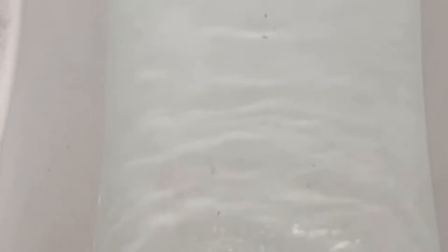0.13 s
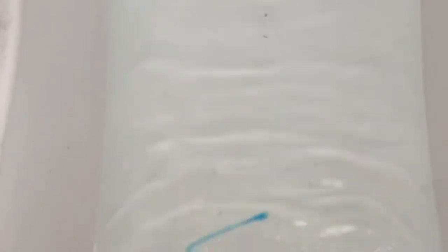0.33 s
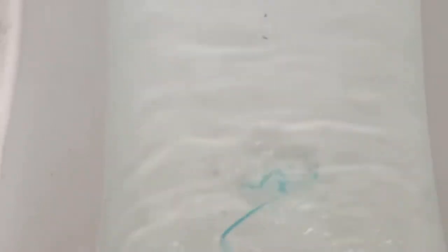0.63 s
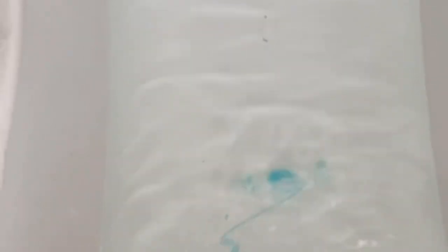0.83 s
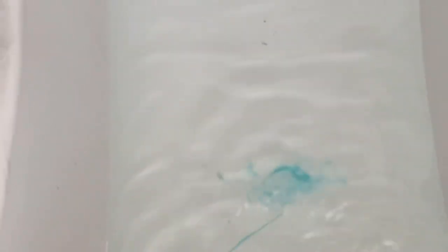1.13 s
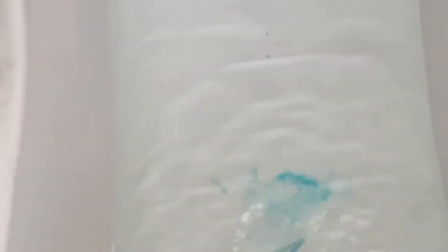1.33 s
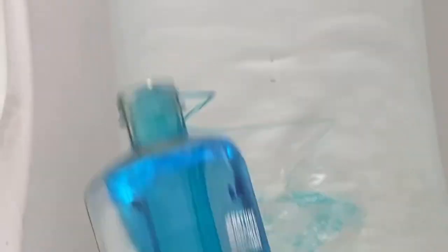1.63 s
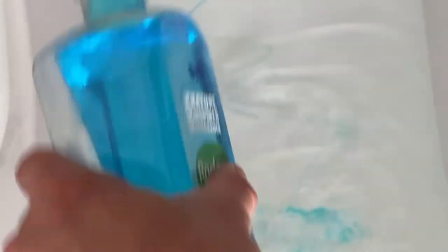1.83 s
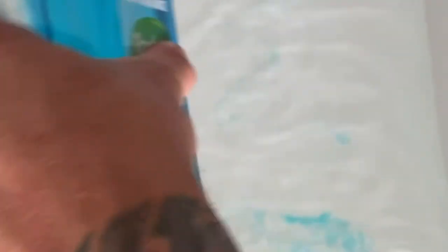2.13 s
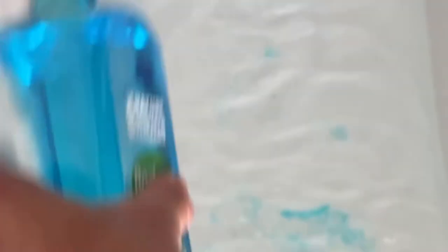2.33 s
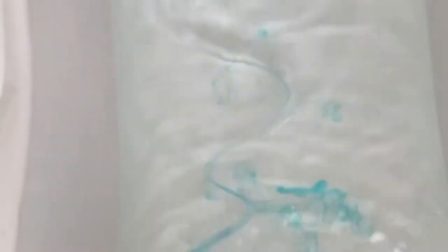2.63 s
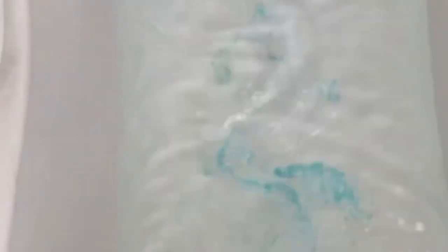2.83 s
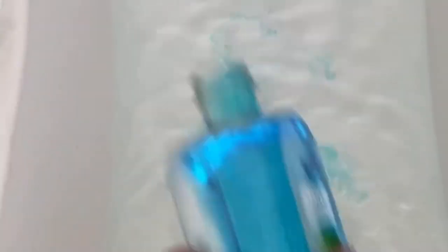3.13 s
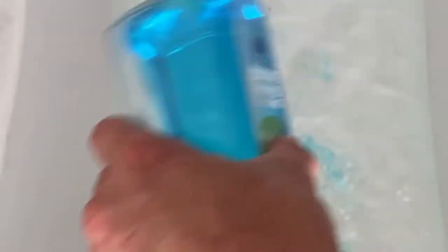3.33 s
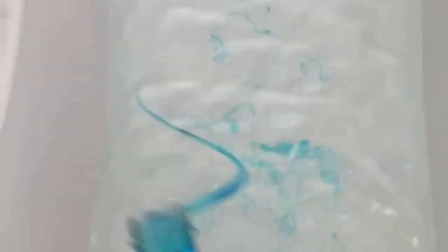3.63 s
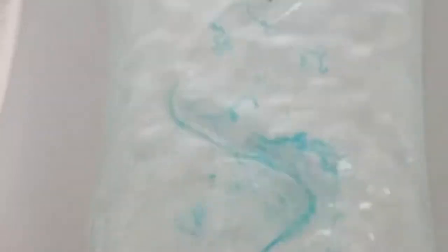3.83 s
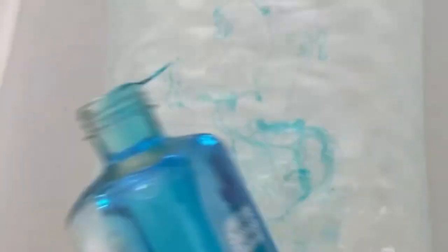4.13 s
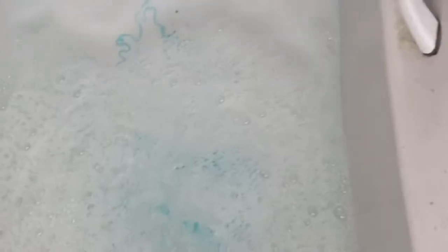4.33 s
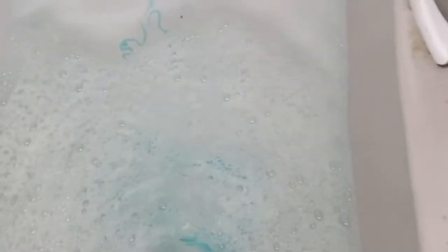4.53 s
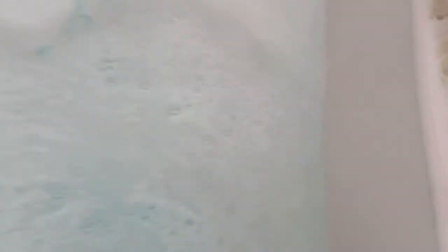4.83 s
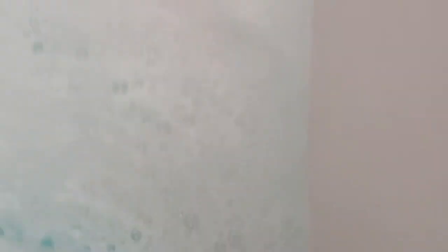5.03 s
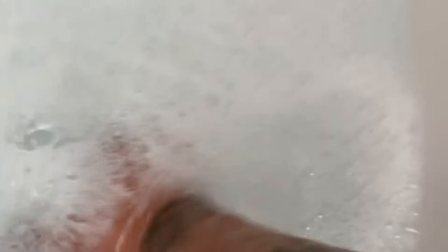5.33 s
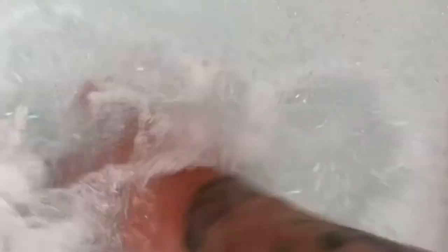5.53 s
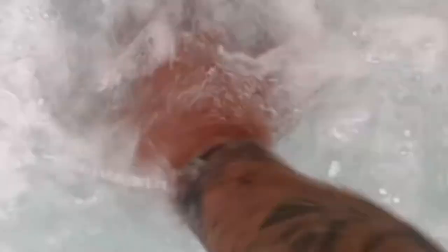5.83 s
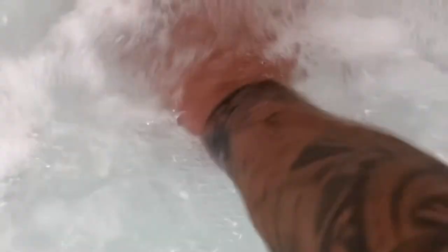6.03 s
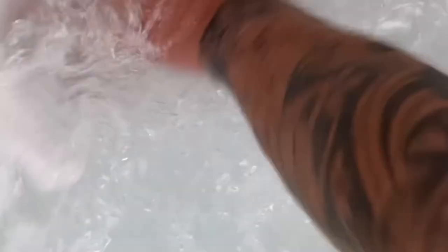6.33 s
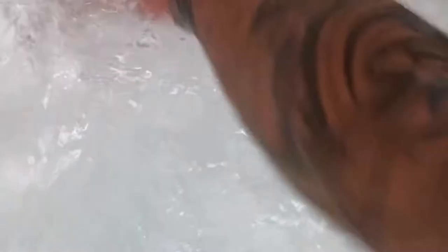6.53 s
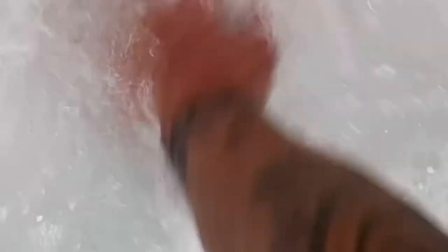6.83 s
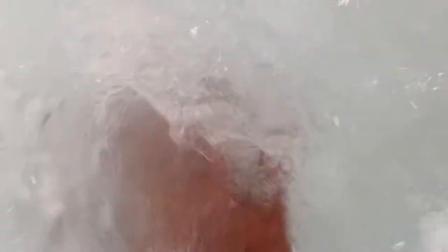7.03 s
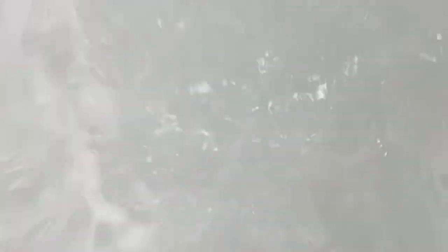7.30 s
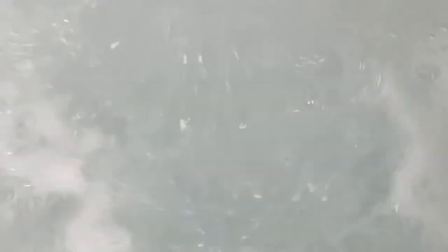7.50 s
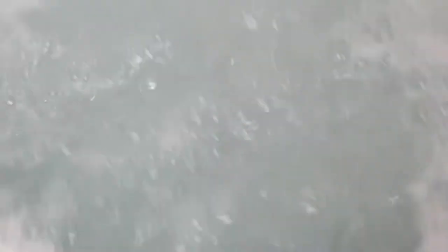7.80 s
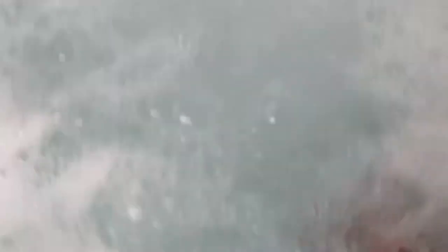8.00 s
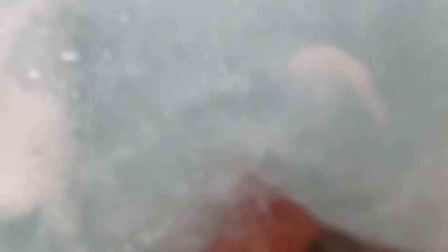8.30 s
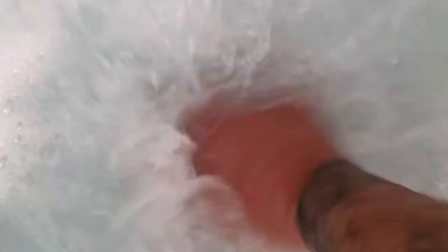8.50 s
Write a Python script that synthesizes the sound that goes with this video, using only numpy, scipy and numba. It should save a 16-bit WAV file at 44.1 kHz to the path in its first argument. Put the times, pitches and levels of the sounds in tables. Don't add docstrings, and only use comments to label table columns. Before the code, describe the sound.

A tap gushes steadily into a filling bathtub, then, suddenly closer, a hand churns the water with thumps, gurgles and splashes until an abrupt stop.

```python
import sys
import numpy as np
from scipy import signal
from scipy.fft import rfft, irfft, next_fast_len
from scipy.io import wavfile
from scipy.ndimage import uniform_filter1d, map_coordinates
from numba import njit

SR = 44100
rng = np.random.default_rng(int(sys.argv[2]) if len(sys.argv) > 2 else 0)


def unload_wav(signal):
    wavfile.write(
        sys.argv[1],
        SR,
        np.round(np.clip(np.atleast_2d(signal).T, -1, 1) * 32767).astype(np.int16),
    )


def volts_from_db(level):
    exponent = np.asarray(level, float) / 20
    return 10 ** exponent


N = 381906
CUT_S = 4.26


def unit(x):
    return x / np.sqrt(np.mean(x ** 2) + 1e-20)


def along(points, hz):
    f, *columns = np.transpose(points)
    return [np.interp(np.log(hz + 1), np.log(f), column) for column in columns]


def filtered(x, response):
    size = next_fast_len(x.shape[-1] + 8192)
    spectrum = rfft(x, size) * response(np.fft.rfftfreq(size, 1 / SR))
    return irfft(spectrum, size)[..., :x.shape[-1]]


def wander(n, rate_hz):
    knots = rng.standard_normal(int(n * rate_hz / SR) + 4)
    return map_coordinates(knots, [np.arange(n) * rate_hz / SR])


def water(start, n, modes, colours, trim_db, grain):
    # time_s, spray_db (jet), churn_db (bath)
    flow = [(0, -36, -40), (2.5, -35, -39), (4.25, -33, -38), (4.27, -29, -38), (4.4, -30, -37.5),
            (4.75, -28, -36.5), (5.0, -30, -34), (5.4, -28.5, -31.5), (5.85, -28.5, -35.5), (6.1, -30, -31),
            (6.55, -31, -33.5), (7.1, -28.5, -29.5), (7.47, -27.5, -29.5), (7.54, -31.5, -33.5),
            (7.65, -31, -32), (8.0, -27, -32), (8.28, -27.5, -32), (8.66, -27, -29)]
    swash_share = (0.91, 0.44, 0.27, 0.1)
    wall_lag_s = 0.035
    time_s, spray_db, churn_db = np.transpose(flow)
    t = (start + np.arange(n)) / SR
    spray_db, churn_db = np.interp(t, time_s, spray_db), np.interp(t, time_s, churn_db)
    flow_db = (churn_db, churn_db, spray_db, spray_db)
    thud, lift = waves(t - wall_lag_s, column=3), waves(t, column=1)
    lifts = (thud, lift, lift, lift)

    gurgle = bubbles(n, count=1500, low_hz=277.4, high_hz=2220, cycles=4.6, spread_db=0.5, rise=0.27)
    ring = bubbles(n, count=1500, low_hz=2100, high_hz=4840, cycles=4.96, spread_db=5.0, rise=0.08)
    fizz = bubbles(n, count=2500, low_hz=3880, high_hz=13200, cycles=5.0, spread_db=10.5, rise=0.036)
    voices = [boom(n, modes)]
    for colour, swarm, share in zip(colours, (gurgle, ring, fizz), grain):
        voices.append(layer(colour, swarm, share, patchy_db=1.0))

    churn, flutter = wander(n, rate_hz=18), wander(n, rate_hz=45)
    churn_depth_db, own_depth_db = (.2, 0.21, 0.46, 0.34), (1.2, 1, 0.33, 0.15)
    flutter_depth_db = (0, .4, 1.2, 1.5)
    total = slosh(t)
    for k, voice in enumerate(voices):
        level_db = flow_db[k] + swash_share[k] * lifts[k] + trim_db[k]
        level_db = level_db + flutter_depth_db[k] * flutter + churn_depth_db[k] * churn
        level_db = level_db + own_depth_db[k] * wander(n, rate_hz=18)
        total = total + volts_from_db(level_db) * voice
    return total


def boom(n, modes, top_hz=1100):
    steady = 0.54

    def shell(f):
        power = 0
        for pitch_hz, width_hz, level_db in modes:
            resonance = f * width_hz / (pitch_hz ** 2 - f * f + 1j * f * width_hz)
            power = power + np.abs(volts_from_db(level_db) * resonance) ** 2.485
        return np.sqrt(power)

    def edges(f):
        return (f / 62) ** 3 / (1 + (f / 62) ** 3) / (1 + (f / top_hz) ** 4)

    x = unit(filtered(patchy(n, patchy_db=0.0), lambda f: shell(f) * edges(f)))
    low = filtered(x, lambda f: 1 / (1 + (f / 125) ** 8))
    swell = uniform_filter1d(uniform_filter1d(unit(low) ** 2, size=900), size=900)
    swell = np.abs(swell) + 0.058
    return unit(x - low + low * swell ** (-steady / 2))


def layer(colour, swarm, grain, patchy_db):
    grain = np.clip(grain, 0, 1)
    mix = np.sqrt(grain) * swarm + np.sqrt(1 - grain) * unit(patchy(len(swarm), patchy_db))
    return unit(filtered(mix, lambda hz: volts_from_db(along(colour, hz)[0]) * (hz > colour[0][0] / 2)))


def patchy(n, patchy_db):
    z = signal.stft(rng.standard_normal(n + 512), nperseg=512)[2]
    field = uniform_filter1d(rng.standard_normal(z.shape), size=7, axis=0)
    field = uniform_filter1d(field, size=6, axis=1)
    return signal.istft(z * volts_from_db(patchy_db * unit(field)), nperseg=512)[1][:n]


def bubbles(n, count, low_hz, high_hz, cycles, spread_db, rise):
    draw = rng.random((count * n // SR, 4))
    start = (draw[:, 0] * n).astype(int)
    hz = low_hz * (high_hz / low_hz) ** draw[:, 1]
    life_cycles = cycles * (.5 + draw[:, 2])
    gain = volts_from_db(-spread_db * np.log(draw[:, 3] + 0.018)) * np.sqrt(hz)
    out = np.zeros(n)
    add(out, start, hz, life_cycles, gain, rise, SR)
    return unit(filtered(out, lambda f: 1 + f / high_hz))


@njit
def add(out, start, hz, cycles, gain, rise, sr):
    for k in range(len(start)):
        life = cycles[k] * sr / hz[k]
        for i in range(min(int(life), len(out) - start[k])):
            u = i / life
            envelope = gain[k] * 16 * u * np.exp(-6 * u)
            out[start[k] + i] += envelope * np.sin(2 * np.pi * cycles[k] * u * (1 + rise * u / 2))


def waves(t, column):
    swashes = [(4.852, 2.5, 0.034, 4.5), (5.083, 8.5, 0.039, 0), (5.162, 8, 0.08, 8),
               (5.34, 4.5, 0.037, -2), (5.537, 6, 0.026, 6.5), (6.002, -1, 0.049, -1.5),
               (6.288, 10, 0.039, -0.5), (6.792, 10.5, 0.044, -0.5), (6.879, 11.5, 0.012, 1.5),
               (6.983, 0, .02, -7), (7.324, 1.5, 0.071, -1), (7.567, 12, 0.056, 1), (7.77, 4.5, 0.12, 2.5),
               (8.309, 16, 0.03, 2), (8.431, 14, 0.028, -1), (8.538, 11.5, 0.018, -0.5),
               (8.652, 11, .04, 0)]
    attack_s, release_s = 0.022, 0.027
    lift_db = 0
    for row in swashes:
        start_s, hold_s = row[0], row[2]
        onset = np.clip(1 + (t - start_s) / attack_s, 0, 1)
        fall = np.exp(-np.maximum(t - start_s - hold_s, 0) / release_s)
        lift_db = lift_db + row[column] * onset * fall
    return lift_db


def slosh(t):
    # pitch_hz, level_db (per Hz)
    slosh_colour = [(150, -2), (260, 1.5), (450, -3), (800, 8.5), (1300, 2), (2200, -32)]
    swarm = bubbles(len(t), count=700, low_hz=210, high_hz=1200, cycles=2.0, spread_db=2.5, rise=0.23)
    body = layer(slosh_colour, swarm, 0.14, patchy_db=-2.0)
    return volts_from_db(-38) * (volts_from_db(waves(t, column=1)) - 1) * body


def plunging_hand():
    # start_s, level_db (peak), pitch_hz, pan_db (left over right)
    thumps = [(5.015, -25, 79, 3), (5.14, -12, 71.4, -2), (5.178, -3, 84, 2), (5.182, -3, 150, 0),
              (5.205, -10, 125, -2), (5.2, -12, 209, -2), (5.245, -19, 101, 0), (5.25, -17, 174, 0),
              (5.293, -12, 105, 2), (5.355, -7.5, 85, 2), (5.548, -10.5, 82.6, 2), (5.585, -13, 96.7, -5),
              (5.64, -11.5, 91, -3), (5.998, -7.5, 79.4, 4), (6.248, -11.5, 83, 2),
              (6.697, -13.5, 87.5, -3), (6.8, -11.5, 93, -2), (7.34, -8, 88, 10), (8.338, -9, 129, -2),
              (8.511, -13, 209, 0)]
    return drops(thumps, cycles=11.2, gain_db=-12.0, rise=0.069) + slaps(thumps, gain_db=-16.5, t60=0.13)


def big_bubbles():
    # start_s, level_db (peak), pitch_hz, pan_db (left over right)
    plops = [(4.688, -10, 2900, -4), (4.94, -14, 2390, -6), (5.085, -22, 790, 8), (5.547, -15.5, 353, 1),
             (6.099, -6, 1670, 4), (6.162, -13.5, 1650, 14), (6.289, -17, 1030, -3), (6.436, -6.5, 2100, 2),
             (6.607, -7.5, 1970, 11), (6.647, -15.5, 1700, 12), (6.783, -14, 1330, 12),
             (6.875, -9.5, 580, -3), (6.921, -19, 1020, 12), (6.965, -13.5, 1690, 12), (6.98, -20, 1860, 6),
             (6.996, 3, 1760, 6.5), (6.998, -12, 1070, 0), (6.997, -16, 2300, -4), (7.189, -4, 3730, -2),
             (7.329, -12, 860, 6), (7.363, -13, 2200, -8), (7.552, -16, 1030, 5), (7.773, -15.5, 487, 0),
             (7.806, -14.5, 1080, 9), (7.847, -5, 1640, 3), (7.6, -18, 1010, -3), (7.625, -21, 890, -2),
             (6.81, -11, 2100, 5), (6.83, -8.5, 1780, 12), (8.555, -20, 1480, 26), (7.045, -14, 905, -1),
             (8.211, -10.5, 3030, 0), (8.281, -19, 875, 8), (8.308, -17, 1410, 18), (8.404, -18, 463, -3),
             (8.429, -24, 860, 5), (8.515, -16, 510, -1)]
    # start_s, level_db (peak), pitch_hz, pan_db (left over right)
    bloops = [(0.694, -4, 2940, 6.5), (0.46, -25, 750, 0), (0.86, -22, 756, -4), (0.88, -22.5, 770, -2),
              (1.158, -22, 1385, -7), (1.38, -23, 1070, -10), (2.365, -23.5, 737, -1), (3.86, -25, 755, -8),
              (3.976, -23, 1040, -10), (4.084, -23, 734, -7), (7.578, -13, 856, -2)]
    # start_s, level_db (peak), pitch_hz, pan_db (left over right)
    gulps = [(1.067, -31, 813, -3), (1.24, -19, 760, -8), (1.299, -22.5, 760, -10), (1.647, -20, 460, -7),
             (1.936, -23, 765, -14), (2.181, -23, 800, -6), (4.443, -19, 1040, 6), (5.091, -11, 495, -3),
             (5.631, -17, 520, 0.0), (5.984, -16, 800, 2), (6.057, -10.5, 550, -5), (6.319, -10.5, 555, -2),
             (6.702, -12.5, 1510, 13), (6.743, -10, 1570, 6), (7.145, -8, 1720, -11),
             (7.185, -6.5, 1910, 2), (7.472, -25, 440, -1), (7.49, -17, 347, 0.0), (7.755, -26, 511, -2),
             (8.326, -8, 480, -1), (8.379, -12, 526, 1.5), (8.54, -22, 450, -2)]
    out = drops(plops, cycles=11.1, gain_db=-4.5, rise=0.011)
    out += drops(bloops, cycles=19.0, gain_db=-4.5, rise=0.013)
    out += drops(gulps, cycles=13.0, gain_db=-11.0, rise=0.017)
    return out + slaps([*plops, *bloops, *gulps], gain_db=-7.0, t60=0.025)


def lapping_ripples():
    # start_s, level_db (peak), pitch_hz
    pockets = [(0.2, -19, 475), (0.501, -21, 308), (0.505, -20, 480), (1.15, -17, 446), (1.241, -22.5, 312),
               (1.663, -16, 500), (1.98, -16, 444), (2.33, -17, 447), (2.415, -19, 740), (2.6, -17, 436),
               (2.699, -22, 310), (2.939, -27, 420), (3.21, -18, 308), (3.275, -15, 302), (3.325, -17, 301),
               (5.1, -6, 900), (5.115, -17, 520), (5.13, -15, 400), (5.16, -9, 990), (5.2, -18, 610),
               (5.221, -11, 900), (5.532, -13, 1190), (5.559, -16, 423), (5.58, -11, 378), (5.6, -16, 520),
               (5.734, -16, 541), (6.805, -11, 810), (6.81, -13, 1550), (6.885, -8, 890), (6.878, -5, 2200),
               (6.84, -13, 1910), (6.89, -10, 1600), (6.3, -6, 1500), (6.33, -12, 2100), (6.95, -19, 1200),
               (6.92, -8, 1500), (7.294, -17, 471), (7.315, -13, 297), (7.33, -13, 280), (7.322, -8, 900),
               (7.405, -10, 340), (7.425, -11, 597), (7.69, -12, 293), (8.05, -10, 460), (8.335, -9, 806),
               (8.35, -19, 191), (8.37, -15, 168), (8.443, -9, 490), (8.461, -3, 546), (8.475, -9, 480),
               (8.485, -5.5, 513), (8.55, -13, 900), (8.654, -7, 950), (8.655, -2, 2550), (8.428, -9, 2600),
               (8.311, -11, 1000)]
    centred = [(*row, 0) for row in pockets]
    return drops(centred, cycles=7.7, gain_db=-10.0, rise=0.033) + slaps(centred, gain_db=-15.5, t60=0.031)


def ticking_droplets():
    # start_s, level_db (peak), pitch_hz, pan_db (left over right)
    ticks = [(0.1034, -30, 3160, 0.0), (0.347, -15, 3140, -1.0), (0.4294, -18, 2870, 8),
             (0.5696, -18, 2900, 9), (0.7462, -26, 3070, 2), (1.71, -11, 3060, -2), (2.726, -16, 3040, 8),
             (2.8746, -15, 2940, 10), (3.5379, -23, 2900, 2.0), (3.6142, -12, 2880, 2),
             (4.3251, -15, 3320, -5), (5.0454, -28, 2990, -2), (5.1756, -17, 3060, -0.5),
             (6.064, -17, 3190, 0.0), (6.2898, -14, 2830, 1.0), (6.323, -8.5, 3350, 6),
             (6.4921, -16, 3280, 5), (6.7441, -14, 3680, 7), (6.777, -11, 3990, 4), (6.8634, -12, 4330, 3),
             (6.9212, -14, 3150, 0.0), (7.4433, -13, 3830, 6), (7.5767, -15, 2580, -12),
             (7.638, -15, 3650, 0.0), (7.951, -15, 3900, 0.0), (8.078, -16, 2940, 1.0),
             (8.114, -15, 3290, 3), (8.1743, -13, 4580, 3), (8.31, -17, 2570, -5), (8.3278, -11, 2570, -2),
             (8.43, -7, 3250, 0.5), (8.538, -13, 2560, 1.0), (8.6376, -16, 2870, 5)]
    return drops(ticks, cycles=7.8, gain_db=-1.0, rise=0.03)


def bursting_drops():
    # start_s, level_db (peak), pitch_hz, pan_db (left over right)
    spits = [(0.2798, -16, 7660, 7), (1.9867, -15, 7200, 0), (3.3558, -9, 11800, -3),
             (4.1132, -20.5, 8660, 7), (4.3278, -13, 7840, 8), (4.4051, -12, 6100, 2),
             (4.5082, -16, 8400, 11), (4.6056, -27, 9080, 2), (4.69, -9, 5730, -1), (4.7437, -5, 8400, 3.5),
             (4.7656, -9, 8030, -1), (4.8168, 5, 7200, -2), (5.0483, -4, 9050, 4), (5.2627, -5, 10900, -6),
             (5.3385, -11, 11200, 5), (5.5283, -27, 9850, -2), (5.6007, -14, 13000, 18),
             (5.6892, 0.5, 8700, 2.5), (5.7347, -8, 10000, 5), (5.921, -4, 10500, 3),
             (5.9624, -23, 9510, -1), (6.002, -9, 9000, 4), (6.1189, -8, 6170, -1), (6.3683, -12, 5440, -1),
             (6.513, -18, 8650, 10), (6.6107, -4, 8600, 2.5), (6.6764, -6, 9450, 3), (7.1941, -9, 7400, 0),
             (7.5322, -13, 6310, -1), (8.499, -17, 11000, 10)]
    return drops(spits, cycles=6.5, gain_db=0.0, rise=.02)


def drops(rows, cycles, gain_db, rise):
    # delay_s, level_db
    walls = [(.007, -62), (0.013, -17.5), (0.019, -13.5)]
    start_s, level_db, pitch_hz, pan_db = np.transpose(rows)
    life_cycles = np.full(len(start_s), cycles)
    out = np.zeros((2, N))
    for port, side in zip(out, (.5, -.5)):
        for delay_s, wall_db in [(0.0013, 0), *walls]:
            start = ((start_s + delay_s) * SR).astype(int)
            gain = volts_from_db(level_db + gain_db + wall_db + side * pan_db)
            add(port, start, pitch_hz, life_cycles, gain, rise, SR)
    return out


def slaps(rows, gain_db, t60):
    out, t = np.zeros((2, N + SR)), np.arange(SR // 10) / SR
    for start_s, level_db, pitch_hz, pan_db in rows:
        def band(f):
            return (f / pitch_hz) ** 2 / (1 + (f / pitch_hz) ** 5) / (1 + (55 / (f + 1)) ** 4)

        burst = unit(filtered(rng.standard_normal(len(t)), band)) * (1 - np.exp(-t / 0.0017))
        burst = burst / (1 + (pitch_hz / 2200) ** 4)
        decay_db = level_db + gain_db - 60 * t / t60
        out[:, int(start_s * SR):][:, :len(t)] += volts_from_db(decay_db + np.outer([.5, -.5], pan_db)) * burst
    return out[:, :N]


def sheen():
    # time_s, level_db
    glints = [(0, -75), (1.75, -72), (1.9, -56), (2.6, -50), (3.1, -54), (3.45, -55), (3.7, -70),
              (4.2, -68), (4.27, -50), (4.42, -49), (4.55, -70), (8.66, -68)]
    time_s, level_db = np.transpose(glints)
    hiss = filtered(rng.standard_normal(N), lambda f: 1 / (1 + (13200 / (f + 1)) ** 16))
    hiss = unit(filtered(hiss, lambda f: f < 15750))
    return volts_from_db(np.interp(np.arange(N) / SR, time_s, level_db)) * hiss


def ports(x, close, table, t60):
    def share(hz):
        return along(table, hz)[0]

    def turn(hz):
        return np.exp(1j * np.outer([1, -1], along(table, hz)[1]) / 2)

    direct = filtered(x, lambda hz: np.sqrt(share(hz)) * turn(hz)) + filtered(close, turn)
    return direct + filtered(bathroom(x + 0.64 * close, t60), lambda hz: np.sqrt(1 - share(hz)))


def bathroom(x, t60):
    hop, t = SR // 32, np.arange(4096) / SR
    wet = np.zeros((2, x.shape[1] + SR))
    padded = np.pad(x, ((0, 0), (hop, 2 * hop)))
    window = np.sin(np.pi * np.arange(2 * hop) / (2 * hop))
    for start in range(0, x.shape[1] + hop, hop):
        tails = rfft(rng.standard_normal((2, len(t))) * volts_from_db(-60 * t / t60))
        tails = irfft(tails / np.abs(tails))
        answer = signal.fftconvolve(padded[:, start:start + 2 * hop] * window, tails, axes=1)
        wet[:, start:start + answer.shape[1]] += answer
    return wet[:, hop:hop + x.shape[1]]


def far_view(close):
    # pitch_hz, width_hz, level_db
    tub_far = [(74.7, 9.6, 1), (105, 19, -11.5), (142, 9, -9), (168.3, 19, -11), (200, 18, -19),
               (237.7, 10.4, -9.5), (304, 35, -12.5), (326, 7.9, -16), (432.6, 12, -11), (503, 12.6, -14.5),
               (581, 15.6, -12), (737, 13, -9), (805, 14.6, -9)]
    # pitch_hz, level_db (per Hz)
    gurgle_far = [(200, -11.5), (330, -9), (380, -14.5), (500, -4), (660, -9), (745, -4), (850, -3),
                  (1000, -5.5), (1400, -5.5), (2000, -5.5), (2600, -29)]
    ring_far = [(1700, -11.5), (2200, -13), (2600, -6.5), (3050, -3.5), (3500, -11.5), (4200, -12),
                (5000, -22)]
    fizz_far = [(3400, -30), (4500, -1), (5300, -2), (6300, .5), (7500, -3), (9000, -2), (11000, -4),
                (13000, -8), (15500, -12), (17000, -20)]
    # pitch_hz, direct_share (of power, 0-1), left_lead_rad
    ports_far = [(60, .9998, 0), (200, .99, .05), (380, .85, .2), (640, .55, 1.2), (1200, .35, 1.3),
                 (2000, .45, 2.3), (3000, .85, 4.1), (4100, .2, 3.8), (5700, .75, 4.7), (7500, .78, 3.85),
                 (9100, .97, 3.14), (11400, .97, 3.14), (13700, .7, 2.3), (15500, .6, 1.1)]
    jet = water(0, close.shape[1], tub_far, (gurgle_far, ring_far, fizz_far),
                trim_db=(4.96, 0.61, 2.77, 0.47), grain=(.25, .4, .13))
    return ports(jet, close, ports_far, t60=0.11)


def near_view(close):
    # pitch_hz, width_hz, level_db
    tub_near = [(77.8, 22.7, 3), (104.4, 9.3, -3.5), (130.4, 11, -18), (174, 5.7, -9), (232, 69, -12),
                (331, 30, -11.5)]
    # pitch_hz, level_db (per Hz)
    gurgle_near = [(180, -11), (300, -13), (500, 1.5), (690, -4.5), (850, -0.5), (1300, -3.5), (1800, -3),
                   (2200, -5), (2800, -14.5)]
    ring_near = [(1700, -31), (2300, -7.5), (3000, -9), (3600, -9), (4200, -8.5), (4600, -12),
                 (5400, -21.5)]
    fizz_near = [(3400, -30), (4700, -1), (5500, -1), (7000, -1), (8500, -2), (10000, -3), (11500, -5),
                 (13000, -10), (15500, -15), (17000, -20)]
    # pitch_hz, direct_share (of power, 0-1), left_lead_rad
    ports_near = [(60, .93, 0), (300, .87, .2), (600, .55, 1.45), (1200, .35, 1.5), (2000, .3, 4.4),
                  (3000, .3, 5.2), (4200, .55, 4), (5800, .65, 4.5), (7500, .8, 3.8), (9100, .97, 3.14),
                  (11600, .97, 3.14), (13700, .75, 2.5), (15500, .6, 1.1)]
    n = close.shape[1]
    jet = water(N - n, n, tub_near, (gurgle_near, ring_near, fizz_near),
                trim_db=(3.5, 4.5, -1.5, -0.6), grain=(.25, .25, .26))
    return ports(jet, close, ports_near, t60=0.056)


def scene():
    cut = int(CUT_S * SR)
    single = plunging_hand() + big_bubbles() + lapping_ripples() + ticking_droplets() + bursting_drops()
    return np.hstack([far_view(single[:, :cut]), near_view(single[:, cut:])]) + sheen()


def roll_off(x):
    return signal.sosfilt(signal.butter(12, 15990, fs=SR, output="sos"), x)


def record(dry):
    rounded = dry / (1 + np.abs(dry / .8) ** 4) ** .25
    mix = filtered(rounded, lambda hz: hz < 15750)
    return roll_off(mix)


dry = scene()
out = record(dry)
unload_wav(out)
```